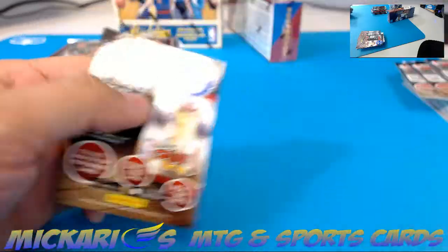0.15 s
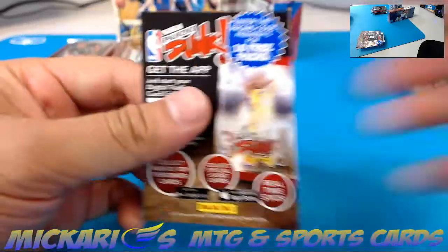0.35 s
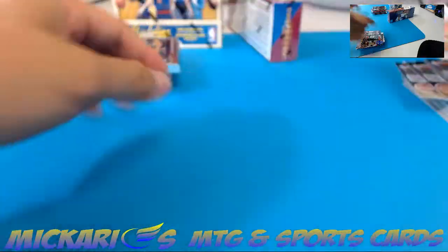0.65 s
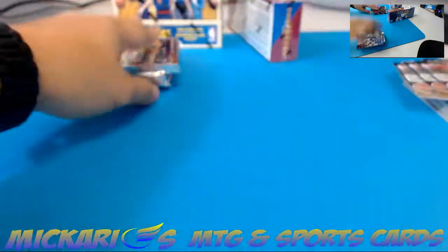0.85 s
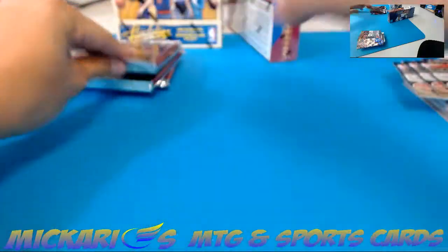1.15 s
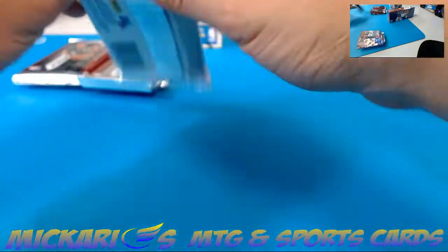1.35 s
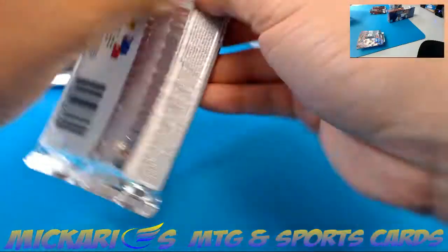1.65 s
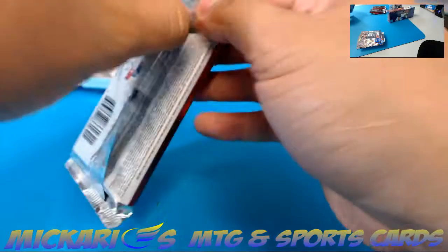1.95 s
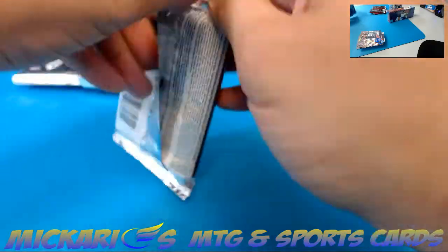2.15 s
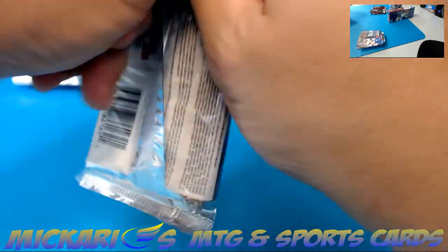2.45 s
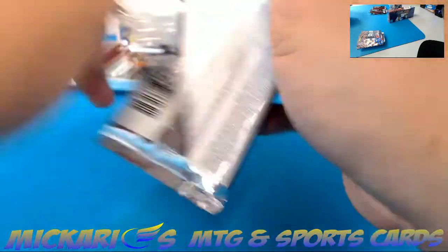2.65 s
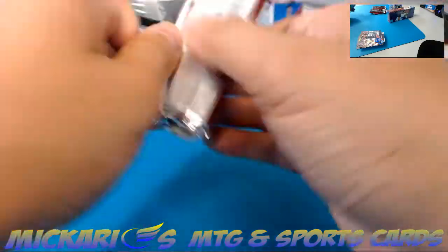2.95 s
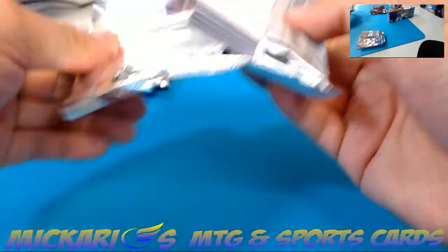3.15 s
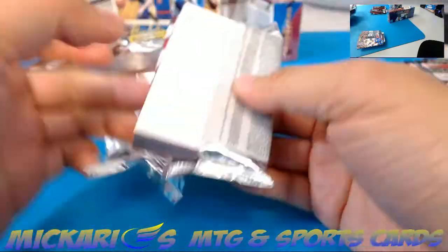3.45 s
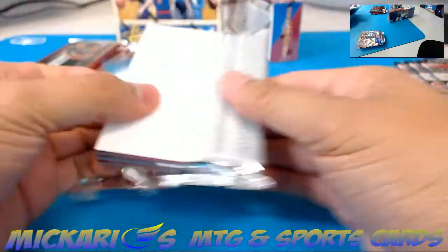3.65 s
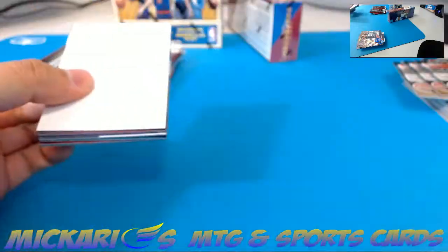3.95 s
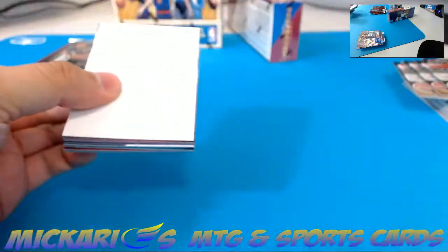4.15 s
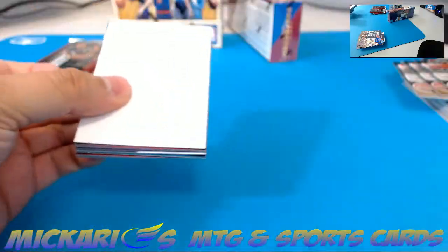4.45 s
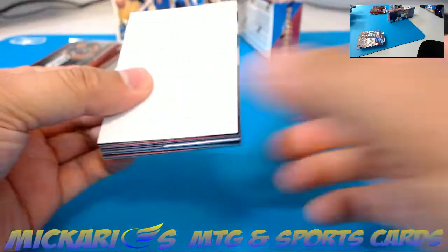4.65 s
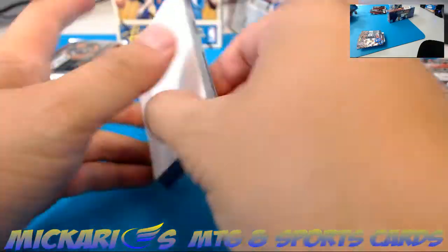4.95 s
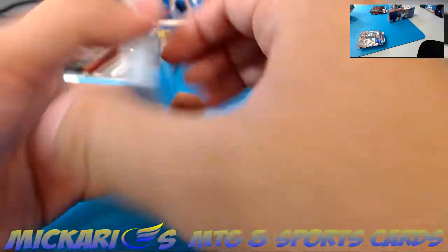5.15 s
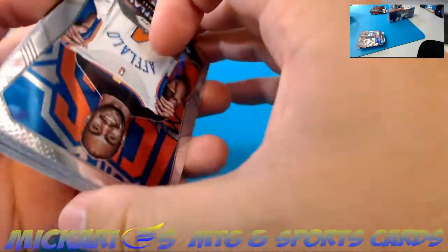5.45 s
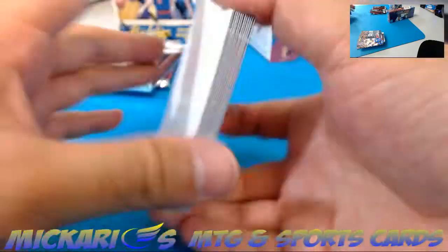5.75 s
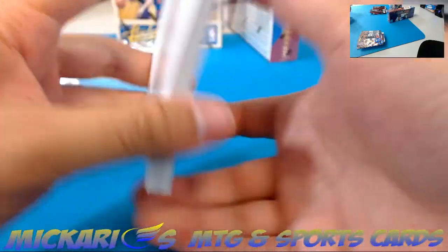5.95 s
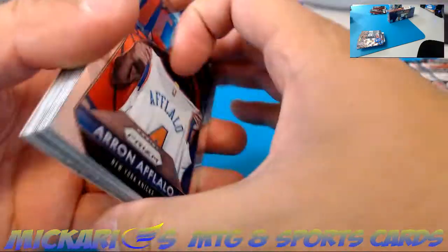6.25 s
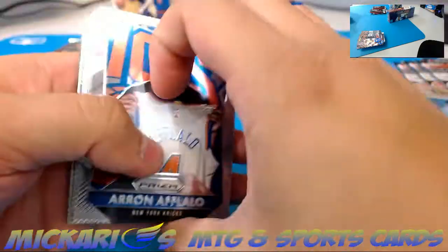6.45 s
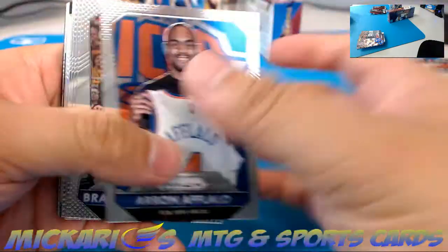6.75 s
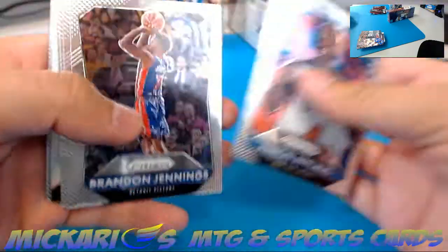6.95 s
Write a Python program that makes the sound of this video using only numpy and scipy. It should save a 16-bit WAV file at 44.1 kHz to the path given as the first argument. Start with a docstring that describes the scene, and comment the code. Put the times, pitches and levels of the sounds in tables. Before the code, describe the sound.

Very close to a small microphone in a quiet room, a packet is bumped and foil begins to crinkle. Crackling grows denser and sharper, with two hard ripping bursts, then more rustle and a loud, hollow double pop as the wrapper comes off. Afterwards it is nearly quiet: soft low thuds and faint papery slides as the card stack is turned and squared, ending in a small springy tap over low room noise.

```python
"""A foil pack of trading cards is torn open by hand over a padded desk, close to a small microphone.
The foil snaps, crackles and rips twice: clicks and swarms of tiny slips ring short sheet resonances.
It comes off the cards with a hollow pop, made of low crackle and of hard blows that ring a body's modes.
Then the stack is turned and squared with soft thuds of low noise, hissing slides and thin notes.
The top card springs off with a tap; a low, wavering room noise with a faint hum lies under it all."""
import sys
import numpy as np
from scipy import signal
from scipy.fft import rfft, irfft
from scipy.io import wavfile
from scipy.ndimage import uniform_filter1d

SR = 44100
rng = np.random.default_rng(int(sys.argv[2]) if len(sys.argv) > 2 else 0)


def int16_out(signal):
    """Quantize to a 16-bit WAV file."""
    q = np.round(np.clip(np.atleast_2d(signal).T, -1, 1) * 32767)
    wavfile.write(sys.argv[1], SR, q.astype(np.int16))


N = 312669

# The time in which the bare stack is turned and squared: start in seconds, end in seconds.
SORTING_SPAN = (3.9, 7.0)
CRUMPLE_RISE_SHARE = 0.58  # share of a foil squeeze spent swelling


def amp(db):
    """Decibels to gain."""
    return 10 ** (np.asarray(db) / 20)


def unit(x):
    """Scales to an energy of 1."""
    return x / np.sqrt(np.sum(x ** 2) + 1e-20)


def read(points, hz):
    """Reads a table on a log-frequency axis."""
    f, value = np.transpose(points)
    return np.interp(np.log(hz + 1), np.log(f + 1), value)


def add(mix, s, sound):
    """Adds a sound to both channels of the mix from time s on."""
    start = int(round(s * SR))
    sound = sound[..., max(-start, 0):]
    part = mix[:, max(start, 0):][:, :sound.shape[-1]]
    part += sound[..., :part.shape[1]]


def arch(s, db, rise, fall):
    """Start time and level curve of a stroke that swells and dies by 20 dB per rise and fall time."""
    t = np.arange(-2 * rise, 2 * fall, 1 / SR)
    return s + t[0], db - 20 * np.maximum(-t / rise, t / fall)


def gesture(s, db, length, rise_share):
    """An arch whose rise and fall times share out a given length."""
    return arch(s, db, rise_share * length, (1 - rise_share) * length)


def scattered(start, end, db, spread_db, hz, octaves, count):
    """Chance events, one in each equal slot of time: rows (s, level dB, Hz)."""
    place, strength, pitch = rng.random((count, 3)).T
    s = start + (end - start) * (np.arange(count) + place) / count
    levels_db = db + spread_db * (2 * strength - 1)
    centres_hz = hz * 2 ** (octaves * (2 * pitch - 1))
    return np.transpose([s, levels_db, centres_hz])


def worked(above_db, spread_db, hz, octaves, count):
    """Chance events in each bout of work on the foil, whose level follows the effort of the fingers."""
    # Four bouts of work on the wrapper. Each row: time in seconds, effort as a reference level in dB.
    bouts = [
        [(0.76, -61), (0.79, -63), (0.842, -62), (0.996, -54), (1.11, -61.5)],
        [(1.22, -54.5), (1.378, -47.5), (1.432, -55.5), (1.554, -57.5), (1.65, -62)],
        [(1.71, -42.5), (1.79, -45), (1.946, -43.5), (2.27, -45)],
        [(3.1, -68), (3.266, -60), (3.398, -51), (3.49, -65.5), (3.62, -64)],
    ]
    events = []
    for bout in bouts:
        when, effort_db = np.transpose(bout)
        rows = scattered(when[0], when[-1], above_db, spread_db, hz, octaves, count=count)
        events += [(s, db + np.interp(s, when, effort_db), centre) for s, db, centre in rows]
    return events


def facet(hz, octaves, ripple_db, smear_s=.0013, low_skirt=0.97, high_skirt=0.97, size=2048):
    """The click of one patch of sheet at two ports: a resonance with uneven lesser modes."""
    # The microphone's colour, dull above 7 kHz. Each row: frequency in Hz, gain in dB.
    mic_colour = [(50, -8.5), (100, -1), (200, 1), (750, 3.5), (1100, -3.5), (1600, -0.5), (2400, -0.5),
                  (3500, 0.5), (5500, 0), (7000, -2), (8300, -14), (11000, -16.5), (12000, -16.5),
                  (15500, -17.5)]
    ports_db = 2.0  # how unevenly the treble of a click reaches the two ports
    f = np.fft.rfftfreq(size, 1 / SR)
    ripple = uniform_filter1d(rng.standard_normal((3, len(f))), size=17)
    ripple /= ripple.std()
    # the patch beams its treble a little differently to each port
    beaming_db = ports_db * ripple[1:] * f / (f + 600)
    colour_db = read(mic_colour, f) + ripple_db * ripple[0] + beaming_db
    # the steepness below and above the resonance can be set separately
    skirt = np.where(f < hz, low_skirt, high_skirt)
    distance = np.log2((f + 1) / hz) / octaves
    gain = amp(colour_db) / (1 + distance ** 2) ** skirt
    # minimum phase: all the ringing follows the snap
    cepstrum = irfft(np.log(gain + 1e-9))
    cepstrum[:, 1:size // 2] *= 2
    cepstrum[:, size // 2 + 1:] = 0
    # bending waves: low notes cross the sheet later than high ones
    delay = smear_s * rng.uniform(0.45, 1.5) / np.sqrt(1 + f / 600)
    phase = 2 * np.pi * np.cumsum(delay) * f[1]
    return np.sqrt(2) * unit(irfft(np.exp(rfft(cepstrum) - 1j * phase)))


def strokes(rows, grains_per_s, spread_db, scatter, ripple_db, clump_db, crowding=0.3,
            clumps_per_s=110, low_skirt=1.25, count=5):
    """Each stroke (start s, level curve dB, Hz, octaves) is a swarm of tiny slips on a few facets."""
    out = np.zeros((2, N))
    for s, curve_db, hz, octaves in rows:
        db = curve_db.max()
        swell = amp(curve_db - db)
        # chance is drawn on a half-second clock
        clock = (int(round(s * SR)) + np.arange(len(swell))) % (SR // 2)
        rate = grains_per_s * amp(crowding * (db + 29))  # harder strokes slip more often
        uneven_db = clump_db * np.clip(-db / 40, .4, 1)  # a hard tear loads all facets more evenly
        swarm = 0
        for _ in range(count):
            chance, strength, sign = rng.random((3, SR // 2))[:, clock]
            sizes = amp(spread_db * np.minimum(-np.log(strength), 3))
            slips = (chance < rate / count / SR) * sizes * np.sign(sign - .5)
            # the load wanders from facet to facet, so the colour keeps shifting
            knots = rng.uniform(-1.7, 1, size=128)
            wander = np.interp(clock / SR * clumps_per_s, np.arange(len(knots)), knots)
            load = amp(uneven_db * wander)
            centre_hz = hz * 2 ** (scatter * min(octaves, 2) * rng.standard_normal())
            colour = facet(centre_hz, octaves, ripple_db, low_skirt=low_skirt)
            swarm = swarm + signal.fftconvolve((slips * load * swell)[None], colour, axes=1)
        add(out, s, amp(db) * np.sqrt(2) * np.linalg.norm(swell) * unit(swarm))
    return out


def background(air_db=-71, waver_db=2, side_db=-16):
    """Low room noise that wavers, with a faint hum wavering alike."""
    # Spectrum of the room noise. Each row: frequency in Hz, relative level in dB per Hz.
    air_colour = [(25, -6.5), (60, -1.5), (100, 2.5), (170, -1.5), (250, -7), (450, -11), (700, -17.5),
                  (950, -13), (2000, -24.5), (6500, -36), (8500, -45), (16000, -45)]
    # Steady hum tones. Each row: frequency in Hz, level in dB before the waver.
    hum_tones = [(102.3, -78), (242.2, -79.5)]
    colour = amp(read(air_colour, np.fft.rfftfreq(N, 1 / SR)))
    noise = irfft(rfft(rng.standard_normal((3, N))) * colour, N)
    t, knots = np.arange(N) / SR, np.arange(0, N / SR + 1, 1 / 20)
    waver = amp(waver_db * np.interp(t, knots, rng.standard_normal(len(knots))))
    hum = sum(amp(db) * np.sqrt(2) * np.sin(2 * np.pi * (hz * t + rng.random())) for hz, db in hum_tones)
    # one noise shared by both channels, plus a little of its own in each
    air = amp(air_db) * (noise[0] + amp(side_db) * noise[1:]) / noise[0].std()
    return waver * (air + hum)


def room(x, same=0.39):
    """A short diffuse ring from desk, boxes and walls, partly alike in both channels."""
    # The room's decay. Each row: frequency in Hz, time to fall by 60 dB in seconds.
    decay = [(150, .2), (1000, 0.18), (4000, 0.074), (12000, 0.072)]
    shared, *own = rng.standard_normal((3, SR // 3))
    hz, t, z = signal.stft(same * shared + (1 - same) * np.array(own), SR, nperseg=256)
    fading = z * amp(-60 * t / read(decay, hz)[:, None])
    tail = signal.istft(fading, SR, nperseg=256)[1]
    tail[:, :SR // 500] = 0  # nothing returns in the first 2 ms
    return signal.fftconvolve(x[None], tail / np.linalg.norm(tail[0]), axes=1)[:, :N]


def presses(width_octaves=0.17, press_s=0.047, size=8192):
    """Skin drags over the stack: short swells of low, narrow noise; further faint grip shifts come by chance."""
    # Fingertip presses, a soft thudding.
    # Each row: time of the height in seconds, level in dB, centre in Hz.
    fingertip_presses = [(0.158, -57, 128), (0.26, -39, 175), (0.522, -57.5, 123), (0.645, -46.5, 113),
                         (1.528, -49, 117), (2.508, -51.5, 127), (3.026, -48.5, 107), (5.205, -61.5, 123.7),
                         (5.635, -53.5, 118.2), (5.976, -49.5, 120), (6.053, -56, 135.3),
                         (6.218, -53.5, 119), (6.27, -60, 139.7), (6.361, -55.5, 113.6), (7.063, -53, 204)]
    out, f = np.zeros((2, N)), np.fft.rfftfreq(size, 1 / SR)
    t = (np.arange(size) - size / 2) / SR
    low_shifts = scattered(*SORTING_SPAN, db=-60, spread_db=-2, hz=115, octaves=0.38, count=18)
    high_shifts = scattered(*SORTING_SPAN, db=-68, spread_db=5.5, hz=252.9, octaves=0.22, count=14)
    swell = np.cos(np.pi * np.clip(t / press_s, -.5, .5)) ** 2
    for s, db, hz in [*fingertip_presses, *low_shifts, *high_shifts]:
        band = 1 / (1 + (np.log2((f + 1) / hz) / width_octaves) ** 2)
        drag = irfft(rfft(rng.standard_normal(size)) * band)
        add(out, s + t[0], amp(db) * np.linalg.norm(swell) * unit(drag * swell))
    return out


def flexes(rise=.008, fall=.016):
    """The stack bends in the fingers and gives a short hollow note."""
    # Each row: time of the height in seconds, level in dB.
    bends = [(0.609, -35.5), (1.321, -44), (1.434, -36.5), (1.531, -48), (1.607, -50), (1.989, -38.5),
             (2.219, -37), (6.46, -61.5), (6.79, -60.5)]
    stack_hz, stack_octaves = 685, .16  # centre and width of the note
    rows = [(*arch(s, db, rise, fall), stack_hz, stack_octaves) for s, db in bends]
    return strokes(rows, grains_per_s=10000, spread_db=1.5, scatter=0.1, ripple_db=-1.0, clump_db=12.5)


def slides(rub_s=0.04):
    """Cards hiss over each other with faint rubs and thin narrow notes."""
    # Cards sliding on cards and skin.
    # Each row: time of the height in seconds, level in dB, length in seconds, centre in Hz.
    card_slides = [(0.059, -72.5, 0.084, 6800), (0.341, -47, 0.031, 3400), (0.42, -74, 0.18, 4070),
                   (4.114, -67, 0.077, 3640), (4.224, -62, 0.028, 5490), (4.437, -67, 0.035, 3610),
                   (4.713, -67, 0.068, 7684), (4.991, -64, 0.04, 5660), (5.158, -68.5, .05, 4660),
                   (5.764, -68, 0.036, 5475), (5.862, -52, 0.056, 4400), (6.07, -74, 0.048, 3990),
                   (6.211, -65.5, .06, 7100), (6.45, -67.5, .045, 1695), (6.51, -79, 0.033, 1990),
                   (6.729, -68, 0.044, 3806), (6.79, -63, .07, 1500), (6.85, -62, 0.058, 3300),
                   (7.035, -55, 0.057, 1920)]
    # Thin short notes: the pop's ring near 2 kHz, then cards sliding.
    # Each row: time of the height in seconds, level in dB, fall time in seconds, centre in Hz.
    thin_notes = [(3.733, -23, 0.011, 1980), (3.756, -21.5, 0.0063, 2020), (3.98, -53.5, 0.047, 2390),
                  (5.635, -66, .04, 2830), (5.849, -48, 0.041, 2630), (5.885, -50.5, 0.028, 2630)]
    slide_rise_share, slide_octaves = 0.37, 1.0
    note_rise_s, note_octaves = 0.0086, .22
    rubs = scattered(*SORTING_SPAN, db=-76.5, spread_db=3, hz=3600, octaves=0.96, count=14)
    moves = list(card_slides) + [(s, db, rub_s, hz) for s, db, hz in rubs]
    hiss_rows = [(*gesture(s, db, length, slide_rise_share), hz, slide_octaves)
                 for s, db, length, hz in moves]
    note_rows = [(*arch(s, db, note_rise_s, fall), hz, note_octaves) for s, db, fall, hz in thin_notes]
    hiss = strokes(hiss_rows, grains_per_s=6000, spread_db=3.5, scatter=0.14, ripple_db=4.0,
                   clump_db=9.5, low_skirt=1.17, count=3)
    notes = strokes(note_rows, grains_per_s=7600, spread_db=1, scatter=0.095, ripple_db=1.5,
                    clump_db=-3, low_skirt=2.2, count=3)
    return hiss + notes


def tap():
    """The top card springs free of the stack and rings briefly."""
    # Each row: time of the height in seconds, level in dB, rise and fall times in seconds,
    # centre in Hz, width in octaves.
    springs = [(7.058, -40, 0.0078, 0.01, 1360, 0.2)]
    rows = [(*arch(s, db, rise, fall), hz, octaves) for s, db, rise, fall, hz, octaves in springs]
    return strokes(rows, grains_per_s=30000, spread_db=-1.5, scatter=0.082, ripple_db=2.5, clump_db=-4)


def bumps():
    """A push of the given length rings the body; longer pushes reach only its lower modes."""
    # Hard blows of pack and cards. Each row: start in seconds, peak level in dB, contact time in seconds.
    hard_blows = [(0.2504, -30, 0.0029), (0.623, -31.5, 0.0062), (2.3085, -14, 0.0014),
                  (2.3611, -11.5, 0.00095), (2.881, -26.5, 0.0027), (3.7271, -2, 0.0011),
                  (3.7317, 4.5, 0.00047), (3.7542, 1, 0.00045)]
    # What the blows ring with.
    # Each row: frequency in Hz, relative level in dB, time to fall by 60 dB in seconds.
    body_modes = [(105, -17, .045), (185.05, -8.5, 0.018), (242, -6.5, .03), (354, 6.5, 0.023),
                  (440.8, -5, 0.0067), (532.5, -1.5, 0.019), (950, -5.5, 0.011), (1510, -8.5, 0.012)]
    out, t = np.zeros((2, N)), np.arange(SR // 6) / SR
    ring = sum(amp(db - 60 * t / t60) * np.sin(2 * np.pi * hz * t) for hz, db, t60 in body_modes)
    for s, db, contact in hard_blows:
        push = np.sin(np.pi * np.minimum(t / contact, 1)) ** 2
        blow = signal.fftconvolve(ring, push)[:len(t)]
        add(out, s, amp(db) * blow / abs(blow).max())
    return out


def hollows():
    """The air in the opened wrapper colours the foil's crackle low and hollow as cards drag and pop out."""
    # Each row: time of the height in seconds, level in dB, length in seconds, centre in Hz.
    sleeve_pops = [(3.425, -40, 0.084, 352), (3.736, -13, .03, 232.3)]
    rise_share, width_octaves = 0.36, 0.5
    rows = [(*gesture(s, db, length, rise_share), hz, width_octaves) for s, db, length, hz in sleeve_pops]
    return strokes(rows, grains_per_s=6000, spread_db=2, scatter=0.33, ripple_db=4.5, clump_db=1.5)


def rustle(length_s=0.044, width_octaves=0.95):
    """Small overlapping flexes keep the foil rustling while the fingers work."""
    flexings = worked(above_db=0.5, spread_db=5, hz=2690, octaves=1.0, count=19)
    rows = [(*gesture(s, db, length_s, CRUMPLE_RISE_SHARE), hz, width_octaves) for s, db, hz in flexings]
    return strokes(rows, grains_per_s=1100, spread_db=3.5, scatter=0.66, ripple_db=7.0, clump_db=8.5, count=2)


def crumples(foil_db=-.5, crinkle_db=-6):
    """Squeezed or jolted, the wrapper gives a dense crackle with stray larger ticks."""
    # Squeezes that swell and relax. Each row: time of the height in seconds,
    # level in dB before the layer gains, length in seconds, centre in Hz.
    squeezes = [(0.734, -45, 0.026, 2680), (0.929, -43, 0.055, 1780), (1.045, -54.5, 0.033, 2600),
                (1.252, -50, 0.091, 3500), (1.325, -38.5, 0.026, 1300), (1.423, -44.5, 0.11, 1730),
                (1.607, -52.5, 0.028, 1860), (1.851, -26.5, 0.062, 1900), (1.907, -36.5, 0.049, 1540),
                (1.977, -30.5, 0.05, 1260), (2.076, -38, 0.037, 3940), (2.439, -39, 0.054, 1390),
                (2.543, -34, 0.025, 1820), (2.718, -37, 0.038, 1690), (3.12, -53.5, 0.06, 1200),
                (3.155, -39.5, 0.03, 2620), (3.221, -38, 0.011, 1290), (3.3, -33, 0.023, 1180),
                (3.371, -35.5, 0.069, 608), (3.422, -47, 0.025, 2500), (3.529, -34, 0.034, 1480),
                (3.571, -43.5, 0.023, 1550), (3.601, -49, 0.029, 1197), (3.874, -55, 0.03, 2697),
                (3.943, -64, .05, 1873)]
    # Card or wrapper is jolted and rustles to rest. Each row: time of the height in seconds,
    # level in dB before the layer gains, fall time in seconds, centre in Hz.
    jolts = [(0.255, -44, 0.037, 304), (0.614, -35, 0.033, 640), (2.308, -17.5, .012, 650),
             (2.362, -17, .022, 848), (2.477, -28.5, 0.049, 1130), (2.634, -39, 0.014, 2140),
             (2.78, -45.5, 0.005, 1860), (3.732, -24.5, 0.025, 1800), (4.03, -34, 0.025, 610)]
    jolt_rise_s, jolt_octaves = 0.007, 1.9
    # harder squeezes move more of the sheet: the width doubles every 29 dB
    squeeze_octaves, widening_db = 1.9, 29
    rows = []
    for s, db, length, hz in squeezes:
        octaves = squeeze_octaves * 2 ** ((db + 36) / widening_db)
        rows.append((*gesture(s, db, length, CRUMPLE_RISE_SHARE), hz, octaves))
    rows += [(*arch(s, db, jolt_rise_s, fall), hz, jolt_octaves) for s, db, fall, hz in jolts]
    foil = strokes(rows, grains_per_s=4200, spread_db=4.5, scatter=0.1, ripple_db=6.0, clump_db=14.5)
    crinkles = strokes(rows, grains_per_s=110, spread_db=4.5, scatter=0.27, ripple_db=3.5,
                       clump_db=0.0, crowding=.2, count=4)
    return amp(foil_db) * foil + amp(crinkle_db) * crinkles


def snaps(level_db=-1, ripple_db=3.5, shiver_db=-10, shiver_t60=0.018, rattle_db=-4, rattle_t60=0.0022):
    """Each crease flips with a click, a short rattle and a shiver of sheet; more creases flip by chance."""
    # Creases that buckle and card edges that tick, loud and faint.
    # Each row: start in seconds, level in dB before the layer gain, centre in Hz.
    creases = [(0.2517, -30.5, 410), (0.2646, -36, 2400), (0.6096, -23, 714), (0.6302, -29.5, 980),
               (0.7244, -32.5, 3900), (0.735, -38, 2640), (0.8418, -35.5, 3150), (0.8654, -30, 3760),
               (0.9074, -28, 1740), (0.9147, -19, 2420), (0.9233, -18, 1610), (0.9361, -24.5, 1870),
               (0.9568, -25, 1930), (1.089, -34.5, 4900), (1.1455, -32.5, 4150), (1.2038, -35, 6250),
               (1.2562, -33, 4140), (1.2999, -26.5, 5800), (1.3753, -22.5, 4700), (1.3942, -24.5, 3670),
               (1.43, -29.5, 3030), (1.4354, -26.5, 1110), (1.4563, -32.5, 1900), (1.498, -23, 2980),
               (1.5233, -31, 1700), (1.533, -32.5, 2390), (1.5857, -30.5, 3700), (1.6047, -25, 2260),
               (1.709, -25, 5950), (1.7168, -22.5, 3700), (1.7618, -31, 4000), (1.8243, -27, 5500),
               (1.836, -26.5, 2810), (1.8542, -14.5, 2830), (1.86, -18.5, 3120), (1.9008, -22, 2660),
               (1.9072, -23.5, 1920), (1.951, -23, 4490), (1.9569, -22, 3640), (1.9827, -20, 2620),
               (2.0471, -20, 3420), (2.0509, -13.5, 4370), (2.0651, -12.5, 3890), (2.078, -20.5, 4400),
               (2.1121, -19, 3750), (2.134, -24.5, 4020), (2.193, -27, 4060), (2.221, -23.5, 990),
               (2.2504, -20.5, 2930), (2.3072, -4, 780), (2.36, -5, 626), (2.3663, -9.5, 1160),
               (2.4293, -24.5, 1600), (2.4417, -22, 3450), (2.4705, -20, 2360), (2.4791, -13.5, 1900),
               (2.5386, -29, 2720), (2.559, -25, 3100), (2.8301, -14, 4700), (2.837, -16.5, 4213),
               (2.8726, -7.5, 750), (2.9097, -13, 1480), (2.9717, -13.5, 3550), (3.0082, -19.5, 3120),
               (3.0382, -25, 4570), (3.1577, -22.5, 3000), (3.2664, -27, 6500), (3.3046, -31, 2980),
               (3.367, -27.5, 2030), (3.5286, -17, 2080), (3.6992, -31, 4100), (3.7295, -16, 2300),
               (3.756, -17, 2010), (3.7802, -30, 2500), (3.8681, -41.5, 2490), (4.0281, -29, 704),
               (4.6697, -44.5, 5030), (5.9397, -48.5, 7328), (6.5878, -60.5, 7500), (6.6347, -53.5, 3680),
               (7.0565, -42.5, 4500)]
    # larger patches of foil sound lower and broader: width at 2 kHz, and exponent of its fall with pitch
    octaves_at_2k, narrowing = 1.2, .22
    out, t = np.zeros((2, N)), np.arange(SR // 20) / SR
    chance_creases = worked(above_db=6.5, spread_db=4.5, hz=3320, octaves=1.0, count=18)
    for s, db, hz in list(creases) + chance_creases:
        rattle, shiver = rng.standard_normal((2, len(t)))
        kick = amp(rattle_db) * unit(rattle * amp(-60 * t / rattle_t60))
        kick += amp(shiver_db) * unit(shiver * amp(-60 * t / shiver_t60))
        kick[0] = 1  # the flip itself
        octaves = octaves_at_2k * (2000 / hz) ** narrowing
        click = unit(signal.fftconvolve(kick[None], facet(hz, octaves, ripple_db), axes=1))
        # the level counts the click's energy as spread over 1 ms
        add(out, s, amp(db + level_db) * np.sqrt(2 * SR / 1000) * click)
    return out


def rips(crackle_db=-7):
    """The seam tears in a dense run of tiny breaks and coarser cracks, as loud as the pull is hard."""
    # The pull on the seam through each of the two rips.
    # Each row: time in seconds, level of the fine breaks in dB.
    pulls = [
        [(2.305, -18), (2.349, -23.5), (2.367, -16), (2.375, -27.5), (2.42, -42)],
        [(2.81, -57), (2.83, -28.5), (2.868, -18), (2.896, -28.5), (2.908, -18), (3.044, -53), (3.05, -61)],
    ]
    rip_hz, rip_octaves = 1318, 1.8
    rows = []
    for pull in pulls:
        when, db = np.transpose(pull)
        curve_db = np.interp(np.arange(when[0], when[-1], 1 / SR), when, db)
        rows.append((when[0], curve_db, rip_hz, rip_octaves))
    breaks = strokes(rows, grains_per_s=3100, spread_db=4.5, scatter=0.68, ripple_db=5.5, clump_db=12, count=8)
    cracks = strokes(rows, grains_per_s=240, spread_db=8.5, scatter=.4, ripple_db=7.0, clump_db=4.0, count=6)
    return breaks + amp(crackle_db) * cracks


def scene(room_db=-18, blow_room_db=-39):
    """Foil and cards shift between left and right in front of the microphone."""
    # Where the sound lies between left and right, as hands work and the wrapper lands.
    # Each row: time in seconds, left minus right level in dB.
    placement = [(.3, 1.7), (.6, -1), (1.2, -.4), (1.7, -1.7), (2.3, -.7), (2.8, -.1), (3.8, 0), (4, -4),
                 (4.1, -4), (4.3, .2), (7, 0)]
    handling = snaps() + crumples() + rustle() + rips() + slides() + flexes() + tap()
    blows = bumps() + presses() + hollows()
    pan_db = np.interp(np.arange(N) / SR, *np.transpose(placement))
    direct = (handling + blows) * amp(np.array([pan_db, -pan_db]) / 2)
    room_feed = (amp(room_db) * handling + amp(blow_room_db) * blows).mean(0)
    return direct + room(room_feed) + background()


def record(dry, bass_hz=90, edge_hz=16100):
    """The microphone drops the deep bass, peaks clip at full scale, then a low-pass limits the band."""
    high_pass = signal.butter(N=5, Wn=bass_hz, btype="highpass", fs=SR, output="sos")
    thin = signal.sosfilt(high_pass, dry)
    low_pass = signal.firwin(401, edge_hz, window=("kaiser", 9), fs=SR)
    return signal.oaconvolve(np.clip(thin, -1, 1), low_pass[None], "same")


dry = scene()
out = record(dry)
int16_out(out)
```